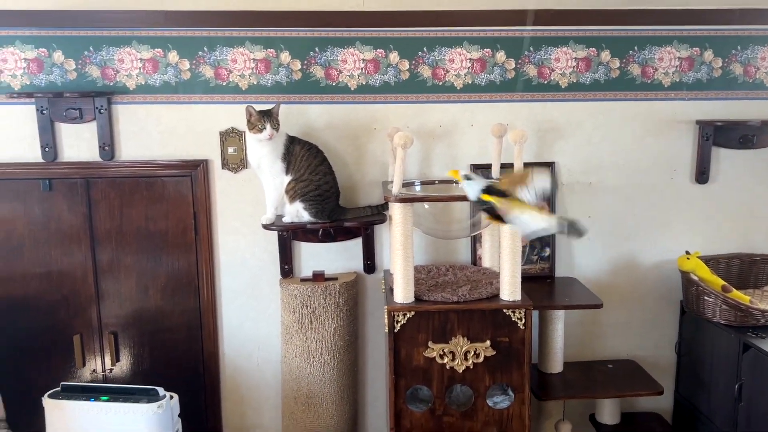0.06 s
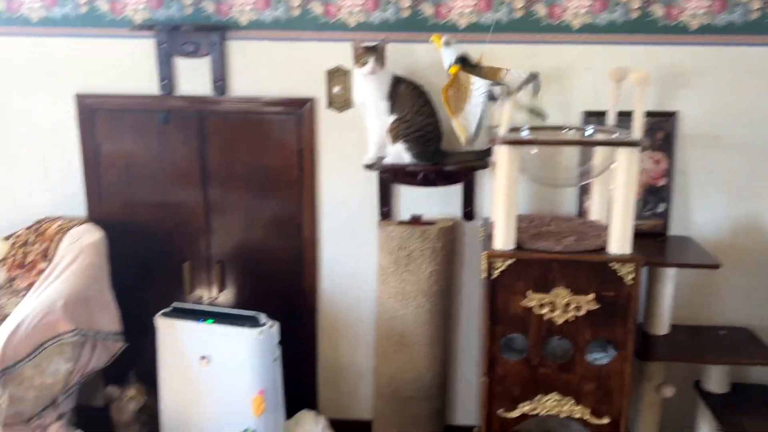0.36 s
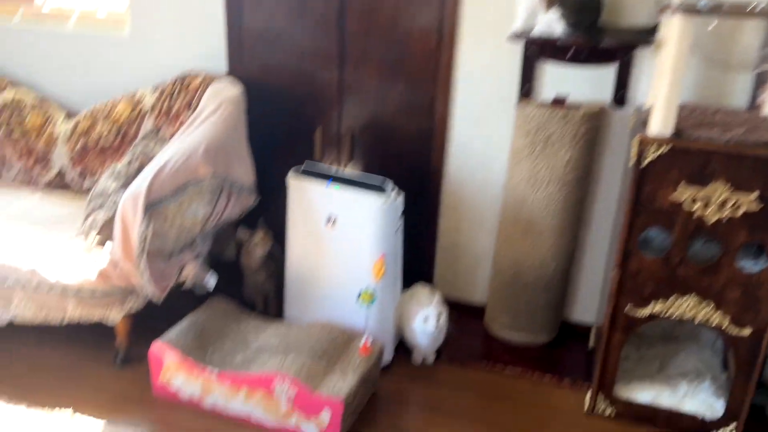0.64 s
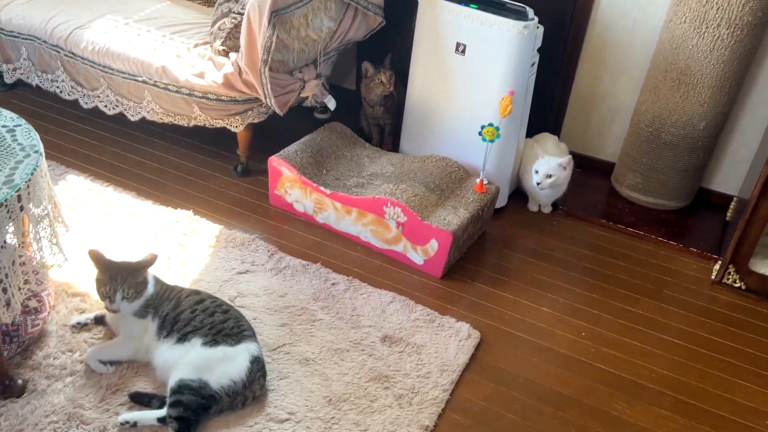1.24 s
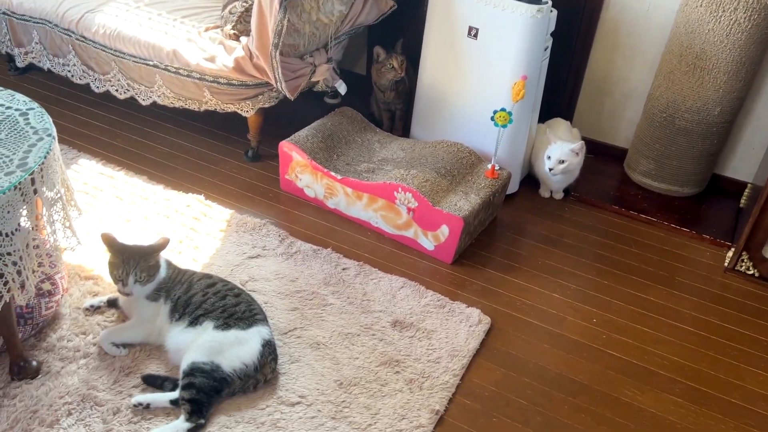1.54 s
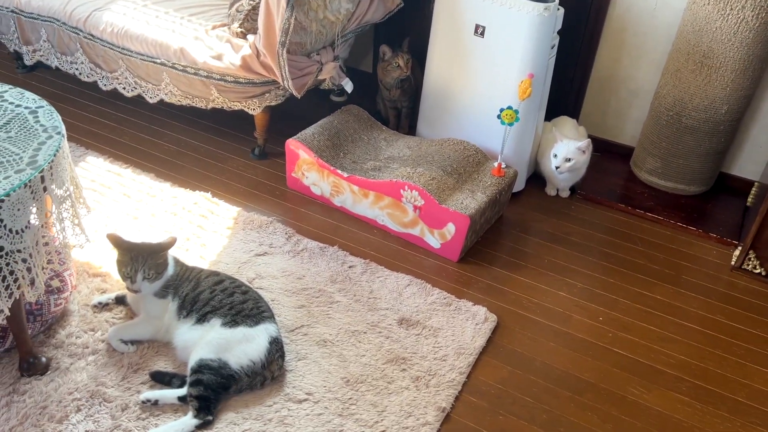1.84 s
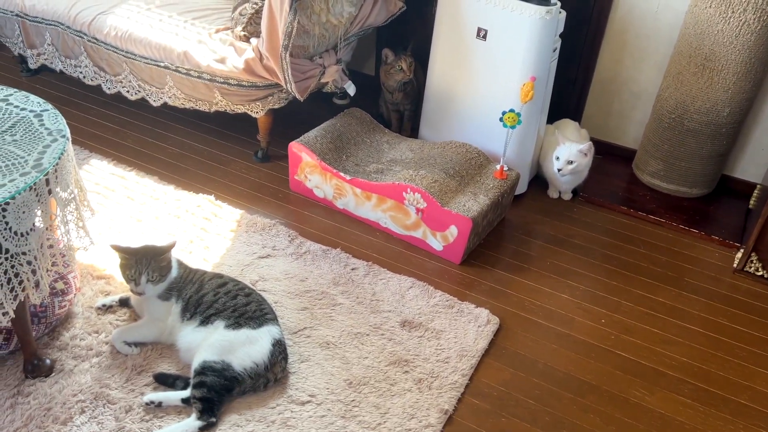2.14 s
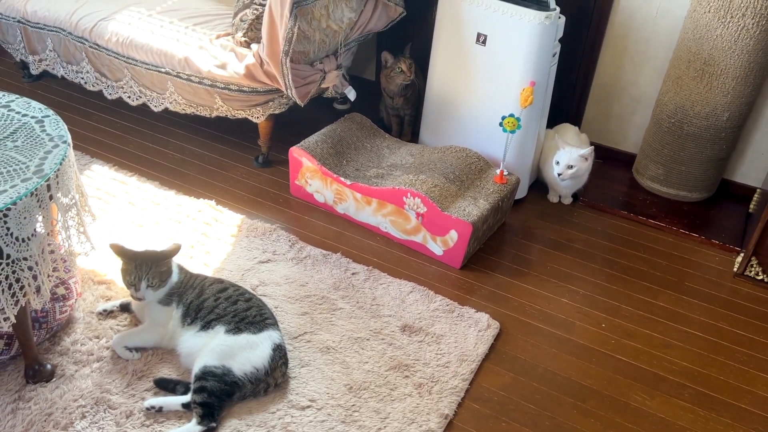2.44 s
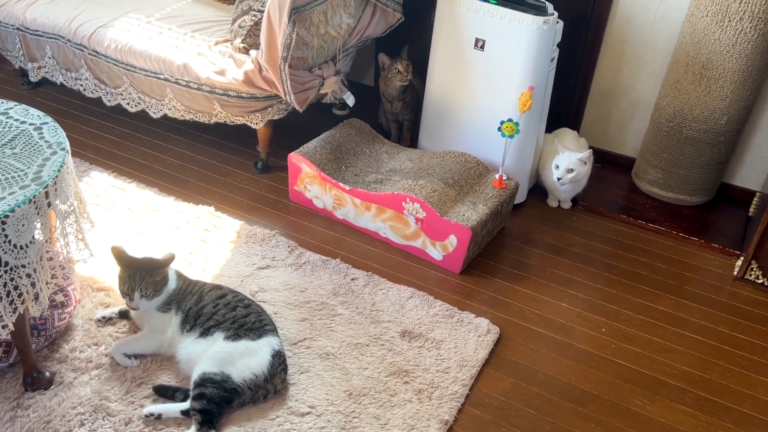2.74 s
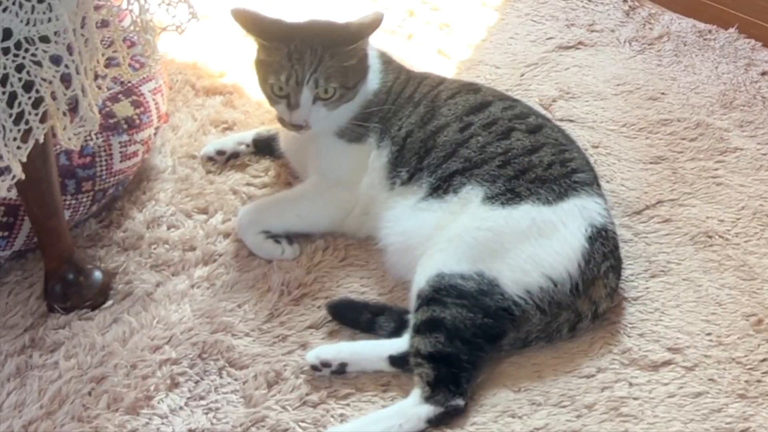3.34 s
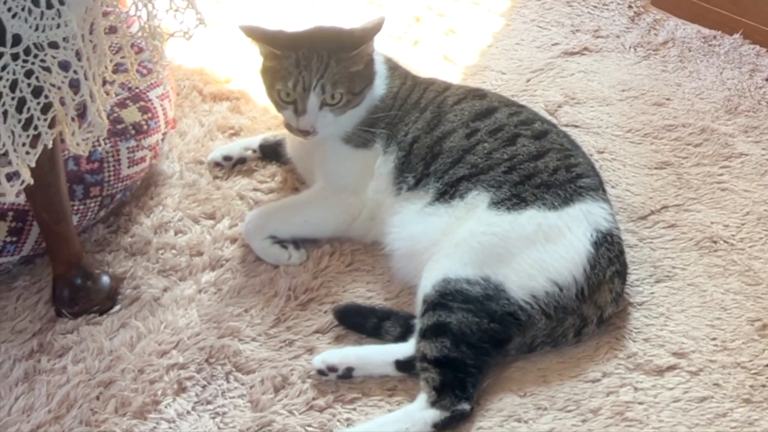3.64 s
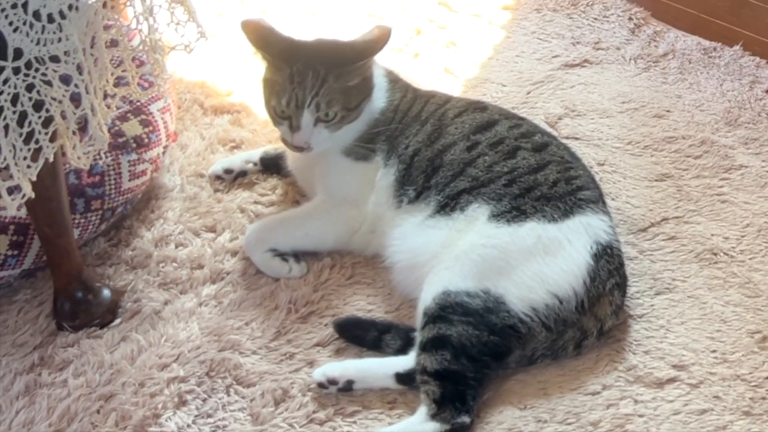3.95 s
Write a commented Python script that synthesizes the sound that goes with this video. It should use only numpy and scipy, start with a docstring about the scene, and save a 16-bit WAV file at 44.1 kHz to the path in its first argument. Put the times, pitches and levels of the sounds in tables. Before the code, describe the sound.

A battery toy bird flaps rapidly, its plastic gears rattling and whining in a room.

```python
"""A living room, with a battery toy bird circling on a string near a pair of microphones.
It flaps about five and a half times a second. Plastic gear teeth rattle and rasp through the hollow body
on each power stroke and rattle thinner on each return; the gear whine sags under the load of every beat.
The wings stir the air, and behind the bird a low hum swells and fades in the room."""
import sys
import numpy as np
from scipy import signal
from scipy.fft import rfft, irfft
from scipy.io import wavfile
from scipy.ndimage import uniform_filter1d

SR = 44100
rng = np.random.default_rng(int(sys.argv[2]) if len(sys.argv) > 2 else 0)


def master(y):
    """Save y as 16-bit WAV."""
    cut = np.clip(np.atleast_2d(y).T, -1, 1)
    pcm = np.round(cut * 32767)  # scale
    wavfile.write(sys.argv[1], SR, pcm.astype(np.int16))


N = 176400
t = np.arange(N) / SR

# Power strokes of the wings. Each row: start in seconds, body rattle in dB, tooth clicks in dB, tooth
# pitch in Hz, its second and third harmonics in dB, hold of the rasp in seconds. Levels are relative.
POWER_STROKES = [(.083,-38.5,-36.5,1200,-28,-36,.02), (.258,-34,-34.5,1125,-26,-35,.035),
                 (.435,-30,-31.5,1100,-29.5,-35.5,0.029), (.625,-35,-33.5,1119,-30.5,-41,.03),
                 (.81,-36,-34,1087,-32.5,-36,0.024), (.98,-39,-33.5,1116,-33.5,-31.5,0.023),
                 (1.169,-38,-34,1090,-30.5,-29.5,0.028), (1.347,-32.5,-34.5,1100,-33,-33,.025),
                 (1.527,-30.5,-32.5,1127,-39,-35.5,0.026), (1.71,-32.5,-34.5,1110,-32.5,-33,.03),
                 (1.891,-36.5,-32.5,1090,-27,-32,.025), (2.082,-41,-33.5,1116,-34,-29,.025),
                 (2.254,-44,-33.5,1116,-27,-31.5,0.046), (2.45,-32.5,-37,1042,-37,-39,.025),
                 (2.628,-34,-35,1029,-33.5,-58,.035), (2.803,-38,-32,1059,-29.5,-45,0.028),
                 (2.982,-44,-33.5,1073,-30,-35,.015), (3.144,-32,-35,1115,-31.5,-36,0.027),
                 (3.324,-45,-33.5,1104,-27,-32,0.028), (3.516,-36.5,-33.5,1132,-36,-29.5,.03),
                 (3.692,-37.5,-34.5,1104,-27.5,-29.5,0.048), (3.888,-33,-37,1053,-43,-36,.025)]


def undb(db):
    """Decibels to gain."""
    return 10 ** (np.asarray(db) / 20)


def unit(x):
    """Scale to rms 1."""
    return x / np.sqrt(np.mean(x ** 2))


def curve(points, at=t):
    """Straight lines between (position, value) points, read over time by default."""
    return np.interp(at, *np.array(points).T)


def tone(hz):
    """Sine of rms 1 that follows a moving pitch."""
    return np.sqrt(2) * np.sin(2 * np.pi * np.cumsum(hz) / SR)


def drift(rate_hz):
    """Smooth random drift of rms 1."""
    step = max(int(SR / rate_hz), 1)
    stairs = np.repeat(rng.standard_normal(N // step + 2), step)
    return unit(uniform_filter1d(uniform_filter1d(stairs, step), step)[:N])


def colour(x, points, size=8192):
    """Minimum-phase filter with the given (Hz, dB) response."""
    hz, db = np.array(points, float).T
    response_db = np.interp(np.log(np.fft.rfftfreq(size, 1 / SR) + 1), np.log(hz), db)
    cepstrum = irfft(np.log(undb(response_db)))
    cepstrum[1:size // 2] *= 2
    cepstrum[size // 2 + 1:] = 0
    return signal.fftconvolve(x, irfft(np.exp(rfft(cepstrum))))[:len(x)]


def resonance(x, hz, width_hz):
    """Band-pass with gain 1 at its centre."""
    return signal.lfilter(*signal.iirpeak(hz, hz / width_hz, fs=SR), x)


def delay(x, lag_s):
    """Delay by a fraction of a sample."""
    return irfft(rfft(x) * np.exp(-2j * np.pi * np.fft.rfftfreq(N, 1 / SR) * lag_s), N)


def wide_noise(spectrum, side_db):
    """Coloured stereo noise; the side level sets its width."""
    mid, side = (unit(colour(rng.standard_normal(N), spectrum)) for _ in range(2))
    return mid + undb(side_db) * side * np.array([[1], [-1]])


def strokes(starts, levels_db, attack_s, hold_s, release_s):
    """Envelope of wing strokes: each is half risen at its start, holds and dies away."""
    envelope = 0
    for start, db in zip(starts, levels_db):
        rise = np.clip((t - start) / attack_s + .5, 0, 1)
        fall = np.exp(-np.maximum(t - start - attack_s / 2 - hold_s, 0) / release_s)
        envelope += undb(db) * rise * fall
    return envelope


def room_hum():
    """In the background, a low swelling hum and a faint higher line over the rumble of the room."""
    # Swell of the hum and of the rumble. Each row: time in seconds, level in dB.
    hum_level = [(0.0, -61), (0.1, -48), (0.24, -48), (0.41, -41), (1.27, -43), (1.31, -48), (1.86, -32),
                 (2.06, -35.5), (2.34, -47.5), (2.61, -38.5), (3.12, -38), (3.31, -32.5), (3.48, -34.5),
                 (3.81, -47.5), (3.9, -40.5), (4.0, -46)]
    rumble_level = [(0.0, -49), (0.03, -45), (0.36, -44.5), (0.4, -47), (0.5, -46), (0.6, -45),
                    (0.65, -44.5), (3.93, -46.5), (4.0, -43)]
    # Colour of the rumble. Each row: frequency in Hz, gain in dB.
    rumble_spectrum = [(20, -21), (36, -10), (50, 2.5), (65, -4), (82, 3), (106, 2), (125, -14), (160, -6),
                       (190, -11.5), (228, -10.5), (300, -16), (400, -18), (600, -26), (3000, -51.5)]
    hum_hz, line_hz = 53.1, 251.6
    hum = tone(hum_hz + .56 * drift(4.46)) * undb(curve(hum_level))
    rumble = wide_noise(rumble_spectrum, side_db=-13.5) * undb(curve(rumble_level))
    faint_line = undb(-62) * tone(line_hz + 1.09 * drift(6.03))
    return hum + faint_line + rumble


def shell_and_room(x, size=12288):
    """The shell smears each knock and the room adds a short tail; both change as the bird flies on."""
    # Room sound at the microphones. Each row: frequency in Hz, level against the direct sound in dB.
    tail_spectrum = [(200, -6), (600, 5.5), (1500, 6), (3000, 6), (5000, 6), (7000, 6), (8500, 2.5),
                     (12000, -6.5)]
    # Balance of the microphones. Each row: frequency in Hz, left minus right in dB.
    balance = [(200, 1.5), (900, 0), (2200, 1), (3300, 2), (4500, 5.5), (6000, 7.5), (7200, 5), (8300, 0),
               (16000, 0)]
    t60_s, spacing_s, smear_s, smear_db = .18, .19, .002, 6
    unit_energy = lambda v: v / np.linalg.norm(v, axis=-1, keepdims=True)
    age = t[:size]
    decay = undb(-60 * age / t60_s)
    paths = np.zeros((3, N + size))
    # Each place on the circle has its own random echoes and crossfades into the next.
    for centre in np.arange(0, t[-1] + spacing_s, spacing_s):
        first, last = max(int((centre - spacing_s) * SR), 0), min(int((centre + spacing_s) * SR), N)
        part = x[first:last] * np.cos(np.pi / 2 * (t[first:last] - centre) / spacing_s)
        noise = rng.standard_normal((3, size))
        smear = (age == 0) + undb(smear_db) * unit_energy(noise[2] * np.exp(-age / smear_s))
        heard = signal.fftconvolve(part[None], np.vstack([noise[:2] * decay, smear]), axes=1)
        paths[:, first:last + size - 1] += np.linalg.norm(part) * unit_energy(heard)
    left_tail, right_tail, direct = paths[:, :N]
    offset_tail_gain = [(hz, -10 * np.log10(1 + undb(db) ** 2 / 2)) for hz, db in tail_spectrum]
    channels = []
    for tail, sign in ((left_tail, 1), (right_tail, -1)):
        blend = colour(direct + colour(tail, tail_spectrum), offset_tail_gain)
        channels.append(colour(blend, [(hz, sign * db / 2) for hz, db in balance]))
    return np.array(channels)


def wings():
    """The wings push a soft puff of air and a low thump late in every beat."""
    # Flaps. Each row: start in seconds, puff in dB, thump in dB.
    flaps = [(.03,-46,-65), (.218,-45.5,-48), (.39,-41.5,-54), (0.571,-44,-52), (.765,-46.5,-50),
             (.948,-47,-51), (1.128,-43,-51), (1.315,-52,-48), (1.485,-46.5,-46.5), (1.657,-45,-44),
             (1.848,-48,-47), (2.023,-43,-43.5), (2.202,-50.5,-47), (2.388,-50,-55), (2.579,-50,-58),
             (2.755,-46.5,-52), (2.926,-46,-50), (3.1,-45.5,-46), (3.272,-47,-47), (3.452,-45,-43.5),
             (3.642,-50,-49), (3.829,-48,-55)]
    # Colour of the stirred air. Each row: frequency in Hz, gain in dB.
    air_spectrum = [(100, -10.5), (230, -10), (310, -4.5), (400, -7), (520, -12.5), (750, -9.5),
                    (1500, -24.5), (4000, -48)]
    starts, air_db, thump_db = np.array(flaps).T
    thump_hz, shape = 235.2, dict(attack_s=.022, hold_s=.001, release_s=.02)
    air = wide_noise(air_spectrum, side_db=-4) * strokes(starts, air_db, **shape)
    thump = tone(thump_hz * (1 + .05 * drift(60))) * strokes(starts, thump_db, **shape)
    return air + thump


def ringing_parts(drive):
    """Two lightly damped parts of the mechanism keep ringing from stroke to stroke."""
    # Their resonances. Each row: frequency in Hz, width in Hz, level in dB.
    modes = [(1940, 7.9, -50.5), (2224, 9.9, -49.5)]
    return sum(undb(db) * unit(resonance(drive, hz, width)) for hz, width, db in modes)


def gear_squeals():
    """The gear train gives brief wavering squeals as the bird passes close to the microphones."""
    # Squeals. Each row: peak time in seconds, pitch in Hz, relative level in dB.
    squeals = [(0.303, 990, -40), (.445, 1197, -37), (0.474, 985, -47)]
    sigma_s = .0099
    waver = 1 + .0059 * drift(60)
    return sum(undb(db) * np.exp(-.5 * ((t - peak) / sigma_s) ** 2) * tone(hz * waver)
               for peak, hz, db in squeals)


def tooth_rasp():
    """Under load the teeth sing on their second and third harmonics, rough and sagging in pitch."""
    sag_per_s = 2.2  # share of the pitch
    jitter = 1 + .06 * drift(900)
    rasp = 0
    for start, _, _, hz, second_db, third_db, hold_s in POWER_STROKES:
        pitch = hz * jitter * (1 - sag_per_s * np.clip(t - start - hold_s / 2, -.1, .1))
        harmonics = undb(second_db) * tone(2 * pitch) + undb(third_db) * tone(3 * pitch)
        rasp += harmonics * strokes([start], [0], attack_s=.0089, hold_s=hold_s, release_s=.012)
    roughness = unit(1 + .68 * drift(1100))
    return rasp * roughness


def crank_phase():
    """Position of the wing crank, 0-1 from one power stroke to the next."""
    starts = np.array(POWER_STROKES)[:, 0]
    period = np.mean(np.diff(starts))
    starts = np.r_[starts[0] - period, starts, starts[-1] + period]
    return np.interp(t, starts, np.arange(len(starts))) % 1


def teeth(hz, jitter, scatter_db, count=8000):
    """One click per passing tooth, uneven in strength and in time (jitter is in tooth spacings)."""
    timing, force = rng.standard_normal((count, 2)).T
    teeth_passed = np.cumsum(hz) / SR
    at = np.interp(np.arange(count) + jitter * timing, teeth_passed, np.arange(N), left=-1, right=-1)
    strength = undb(scatter_db * np.clip(force, -2, 2))
    clicks = np.bincount(np.round(at[at >= 0]).astype(int), strength[at >= 0], N)
    return clicks - uniform_filter1d(clicks, 441)  # takes out the steady offset


def gears():
    """Meshing teeth whine and loose teeth knock in the plastic shell, hardest when the wings load them."""
    # Gear speed through one beat. Each row: share of the beat, tooth mesh rate in Hz.
    mesh_speed = [(0, 1242), (.22, 1019), (.4, 979.5), (.6, 853.7), (.76, 699), (1, 1235)]
    # Return strokes. Each row: start in seconds, relative level in dB.
    return_strokes = [(0.0, -32), (0.162, -29.5), (0.337, -28.5), (0.516, -30.5), (0.697, -31),
                      (0.88, -29.5), (1.062, -31), (1.257, -31), (1.432, -29), (1.609, -29.5),
                      (1.794, -30.5), (1.974, -31), (2.158, -30.5), (2.335, -29.5), (2.522, -31),
                      (2.696, -32.5), (2.871, -31), (3.046, -30), (3.223, -30.5), (3.402, -31),
                      (3.591, -29), (3.771, -30), (3.961, -30.5)]
    # Swell of the running gears. Each row: time in seconds, relative level in dB.
    running_level = [(0, -32.5), (.35, -34.5), (.6, -36), (1.1, -33.5), (1.35, -36), (1.5, -40.5),
                     (1.7, -39), (2.05, -33.5), (2.4, -36), (2.95, -36.5), (3.12, -38.5), (3.45, -35),
                     (4, -36.5)]
    # Colours of the hollow body, tooth clicks, return rattle, running gearbox and small whirring gears.
    # Each row: frequency in Hz, gain in dB.
    body_spectrum = [(300, -62), (750, -23), (1100, -6.5), (1700, -5), (2230, -3.5), (2700, -1),
                     (3300, 1.5), (4100, -16), (8000, -13.5), (16000, -65)]
    click_spectrum = [(500, -43), (2000, 4.5), (4000, 1), (5300, 0.5), (6500, 5.5), (7800, 3), (8650, 1),
                      (11300, 1), (16000, -18)]
    return_spectrum = [(400, -20), (1200, 1), (2200, 4), (2800, 3), (3450, 8.5), (3900, 4), (4500, 3.5),
                       (5400, -1.5), (6700, -2), (8650, -1.5), (11300, -6), (16000, -25)]
    gearbox_spectrum = [(250, -17), (650, -16.5), (1000, -7.5), (1500, 2), (2050, -1.5), (2700, -0.5),
                        (3300, -3), (5200, -18), (6500, -7.5), (8650, -12.5), (11300, -29), (16000, -19.5)]
    whirr_spectrum = [(1500, -20.5), (3800, 1), (5200, 2.5), (8800, -9), (12000, 1.5), (16000, -26)]
    # Ringing of the shell. Each row: frequency in Hz, width in Hz, gain added over the broad rattle.
    shell_modes = [(1944, 195, 0.49), (2240, 123, 0.78), (3516, 810, 0.34), (4560, 410, 0.58),
                   (7130, 160, 0.32), (8610, 1000, 1)]

    mesh_hz = curve(mesh_speed, crank_phase()) * (1 + .035 * drift(14))
    knock_hz = 700 * mesh_hz / mesh_hz.mean()
    meshing = teeth(mesh_hz, jitter=.041, scatter_db=.5)
    whine = lambda spectrum: unit(colour(meshing, spectrum))
    rattle = lambda spectrum: unit(colour(teeth(knock_hz, jitter=.4, scatter_db=3), spectrum))

    starts, body_db, click_db, *_ = np.array(POWER_STROKES).T
    body = unit(rattle(body_spectrum) + undb(-10) * whine(body_spectrum))
    body *= strokes(starts, body_db, attack_s=.016, hold_s=.024, release_s=.016)
    clicks = rattle(click_spectrum)
    clicks *= strokes(starts, click_db, attack_s=.009, hold_s=.015, release_s=.016)
    returns = rattle(return_spectrum)
    returns *= strokes(*np.array(return_strokes).T, attack_s=.007, hold_s=.014, release_s=.012)
    running = unit(rattle(gearbox_spectrum) + undb(-10.5) * whine(gearbox_spectrum))
    whirr = undb(-44) * rattle(whirr_spectrum)
    flicker_db = 1.74 * drift(34.73)
    running *= undb(curve(running_level) + flicker_db)
    mechanism = body + clicks + returns + whirr + running
    return mechanism + sum(gain * resonance(mechanism, hz, width) for hz, width, gain in shell_modes)


def scene():
    """The bird in the room, a little left of the microphones, over the hum."""
    rasp = tooth_rasp()
    mechanism = gears() + undb(-5) * rasp + gear_squeals()
    direct_rasp = undb(-8) * rasp
    left, right = shell_and_room(mechanism) + direct_rasp
    bird = np.array([left, delay(right, lag_s=1.5e-5)])  # reaches the left microphone first
    return bird + ringing_parts(bird) + wings() + room_hum()


def record(dry):
    """The recorder cuts the treble steeply above 15.8 kHz."""
    return signal.sosfilt(signal.ellip(10, .2, 80, 15800, fs=SR, output="sos"), dry)


dry = scene()
out = record(dry)
master(out)
```